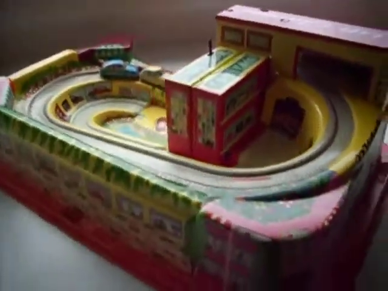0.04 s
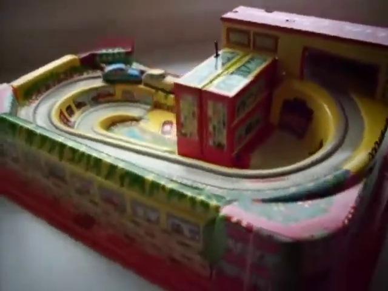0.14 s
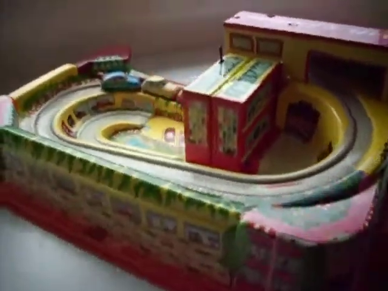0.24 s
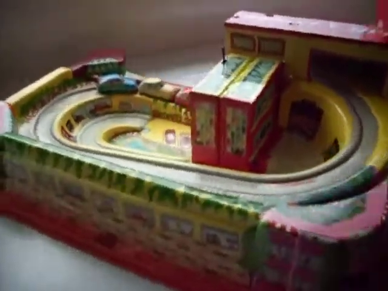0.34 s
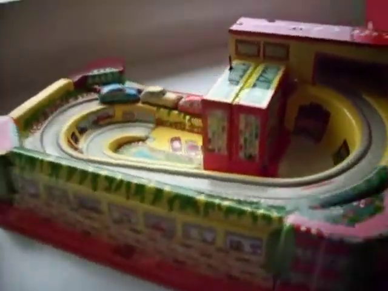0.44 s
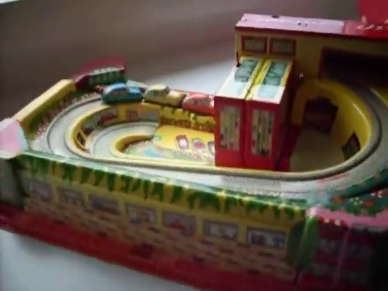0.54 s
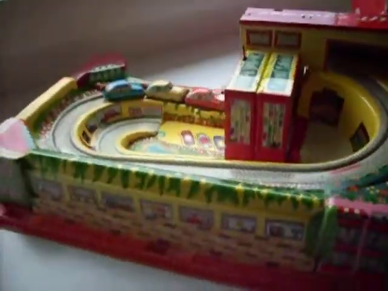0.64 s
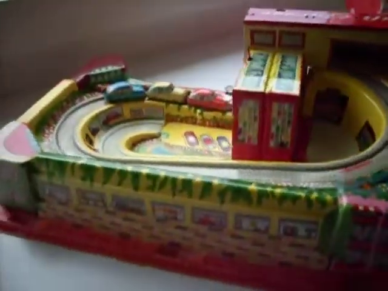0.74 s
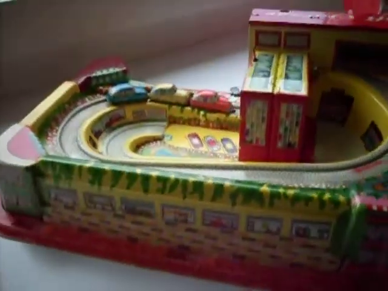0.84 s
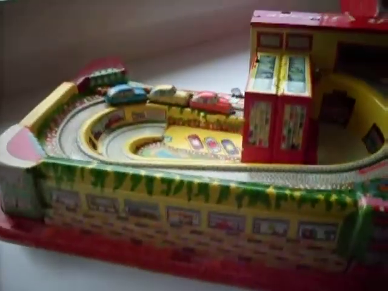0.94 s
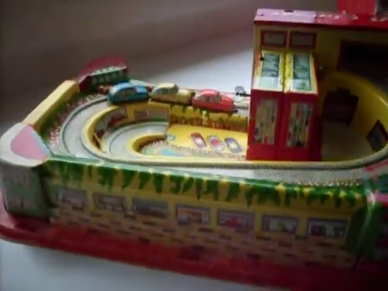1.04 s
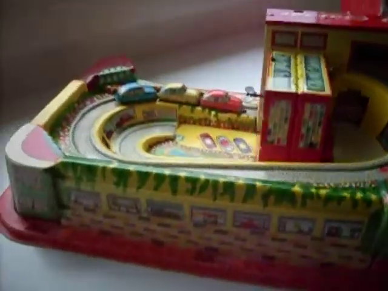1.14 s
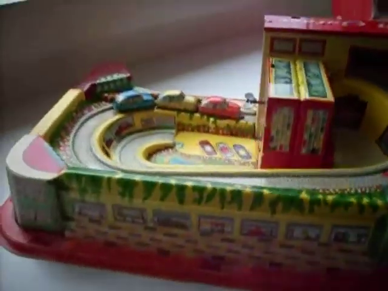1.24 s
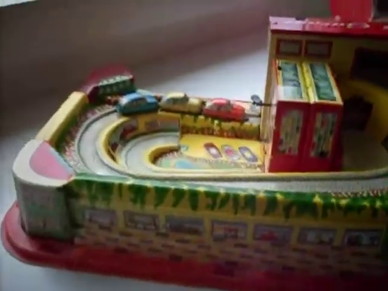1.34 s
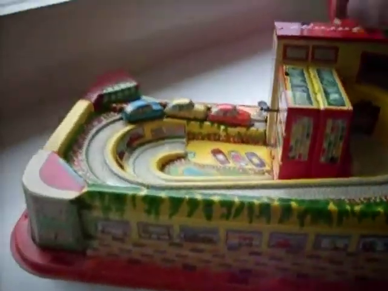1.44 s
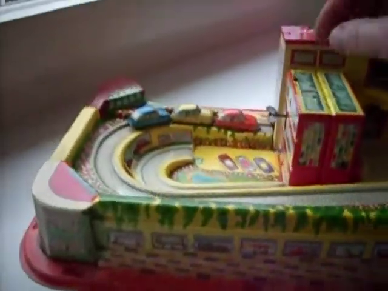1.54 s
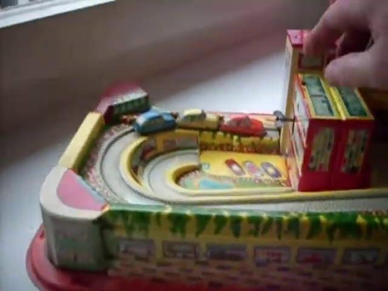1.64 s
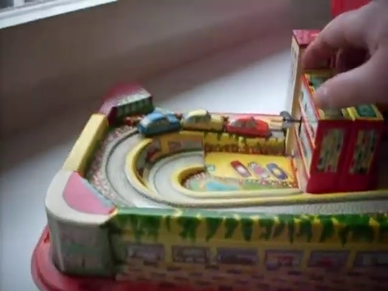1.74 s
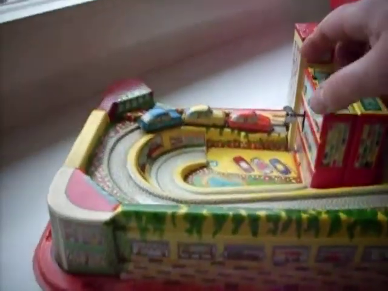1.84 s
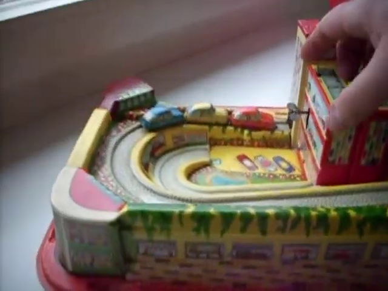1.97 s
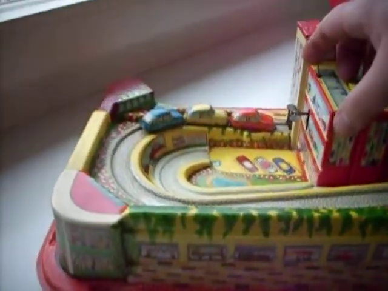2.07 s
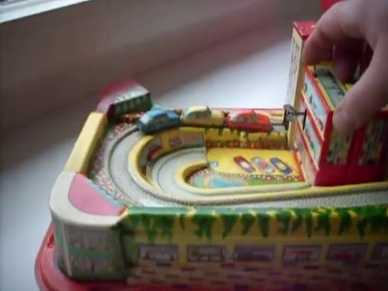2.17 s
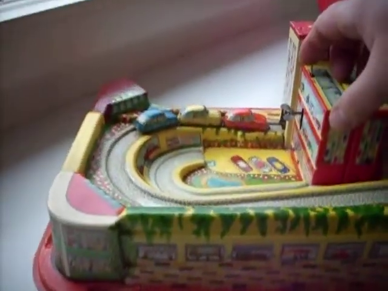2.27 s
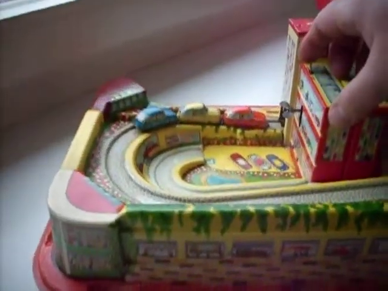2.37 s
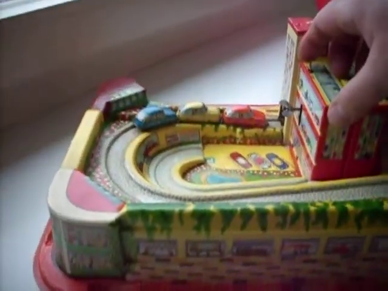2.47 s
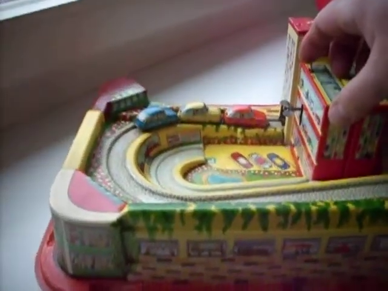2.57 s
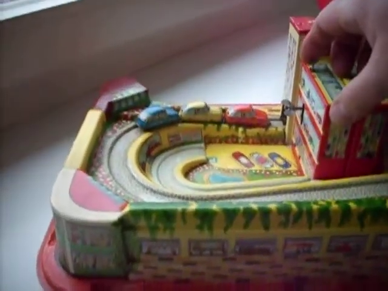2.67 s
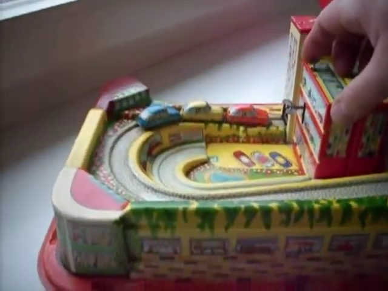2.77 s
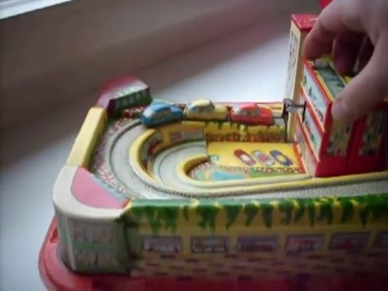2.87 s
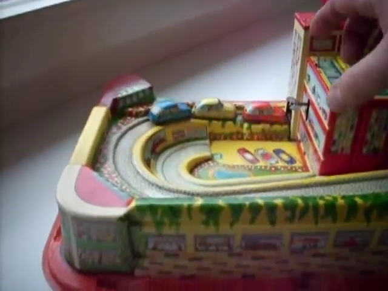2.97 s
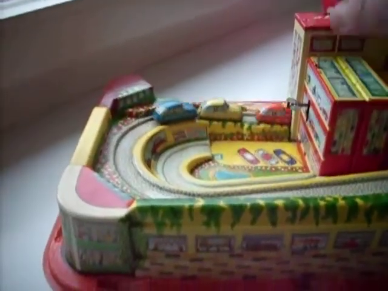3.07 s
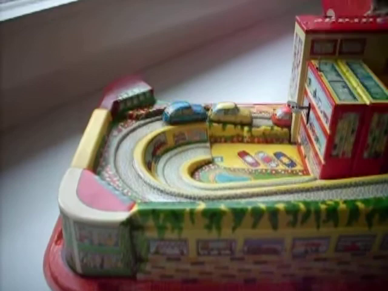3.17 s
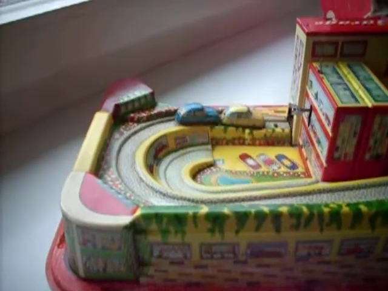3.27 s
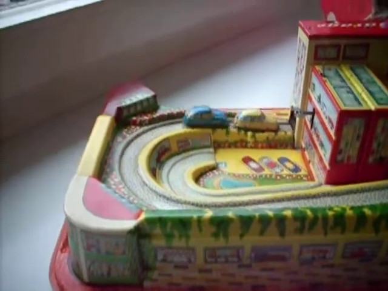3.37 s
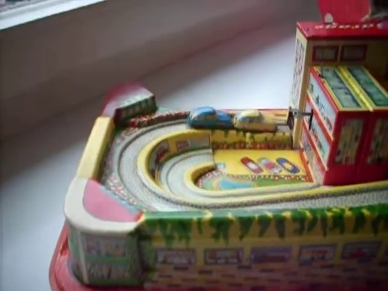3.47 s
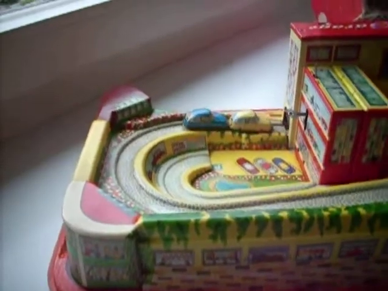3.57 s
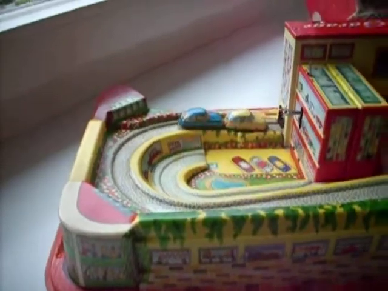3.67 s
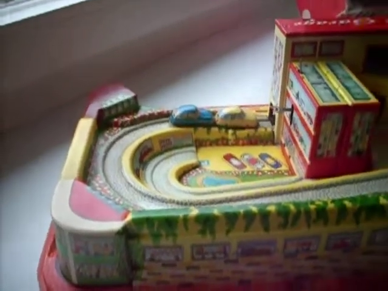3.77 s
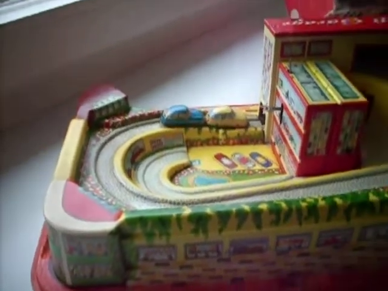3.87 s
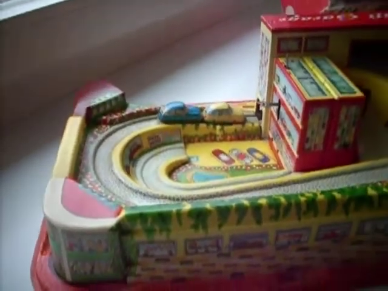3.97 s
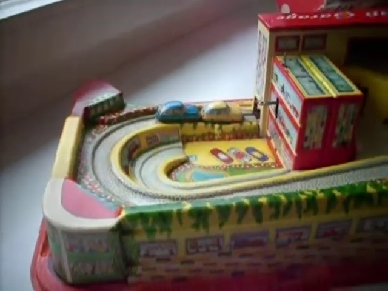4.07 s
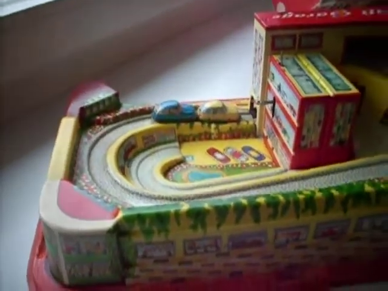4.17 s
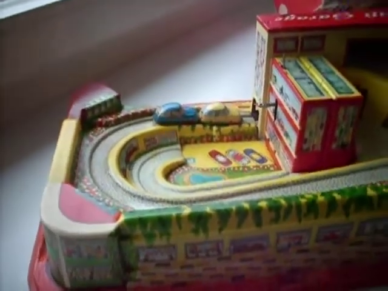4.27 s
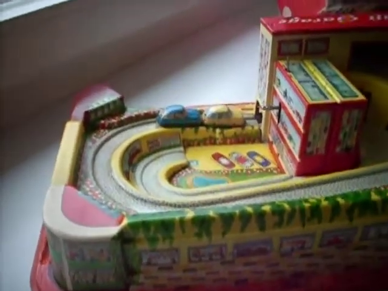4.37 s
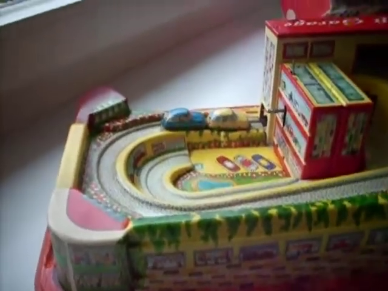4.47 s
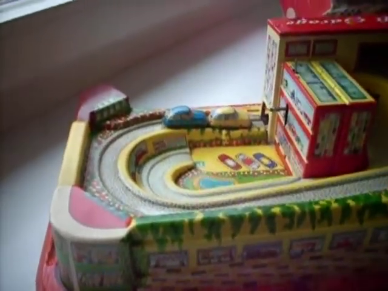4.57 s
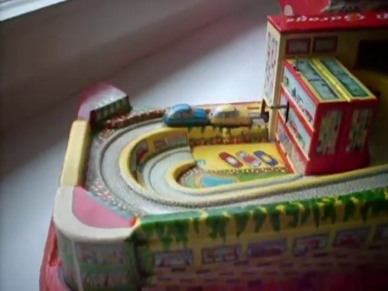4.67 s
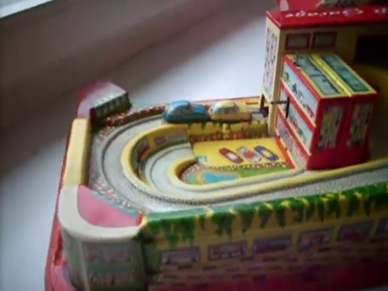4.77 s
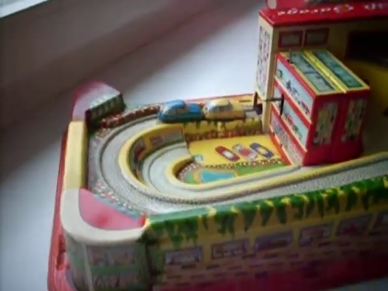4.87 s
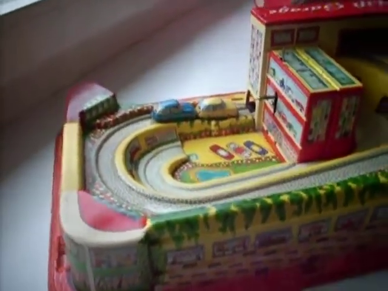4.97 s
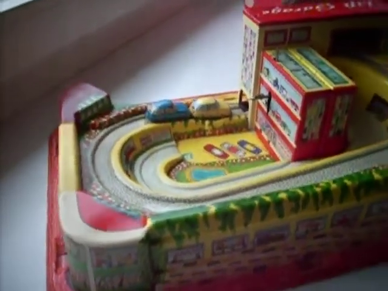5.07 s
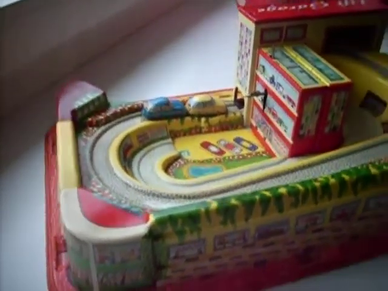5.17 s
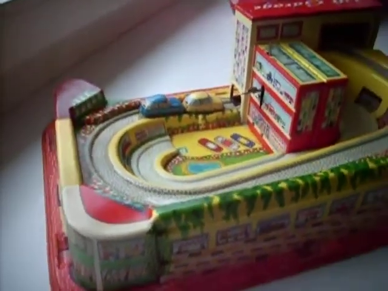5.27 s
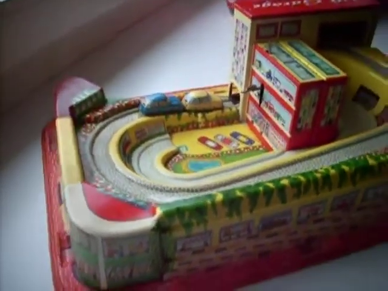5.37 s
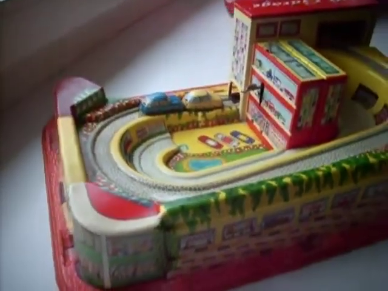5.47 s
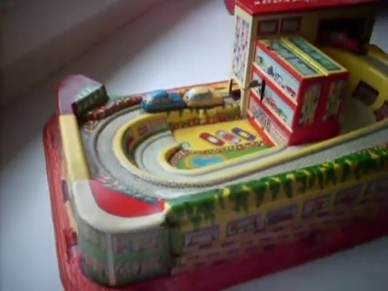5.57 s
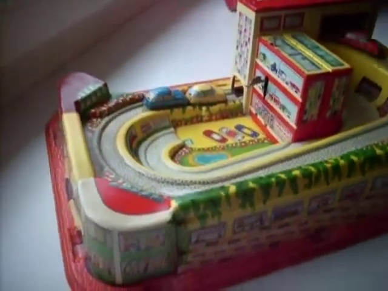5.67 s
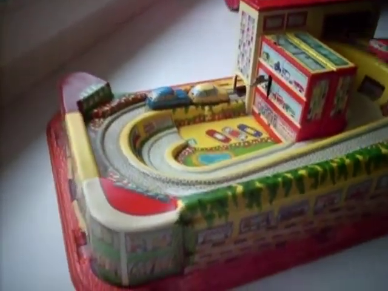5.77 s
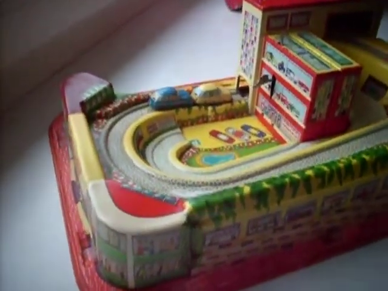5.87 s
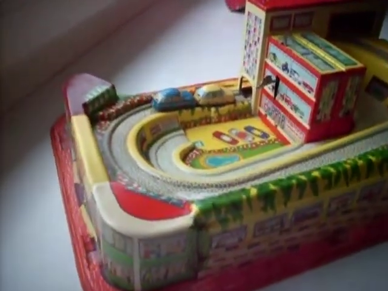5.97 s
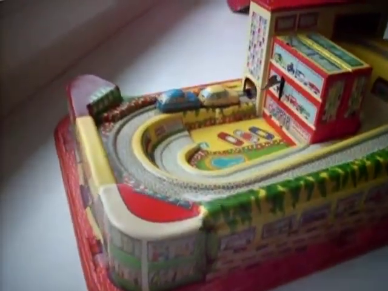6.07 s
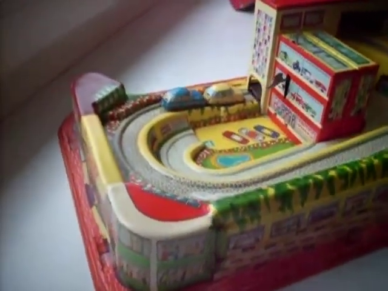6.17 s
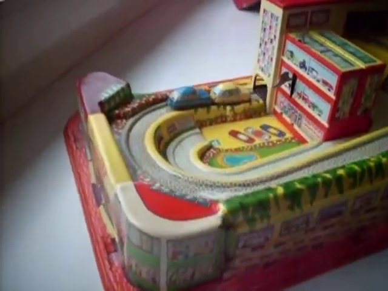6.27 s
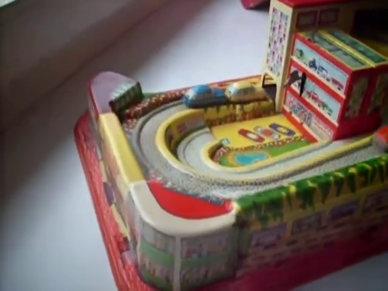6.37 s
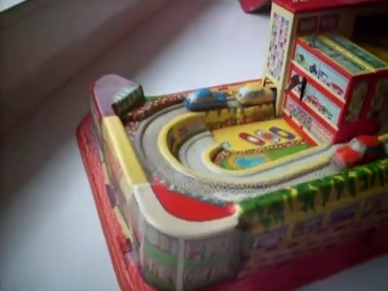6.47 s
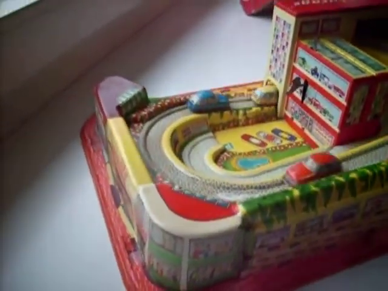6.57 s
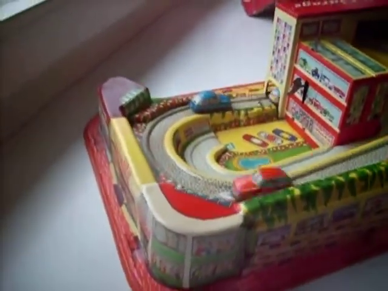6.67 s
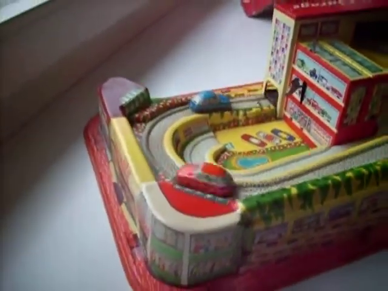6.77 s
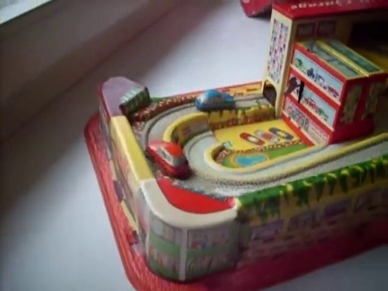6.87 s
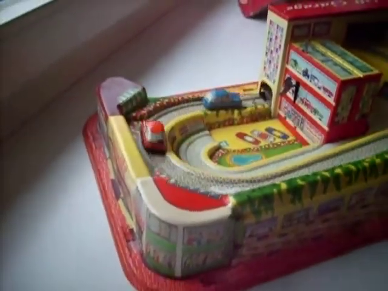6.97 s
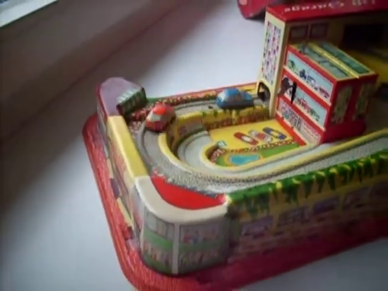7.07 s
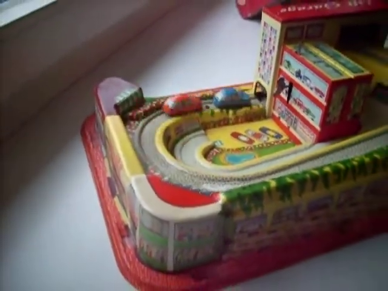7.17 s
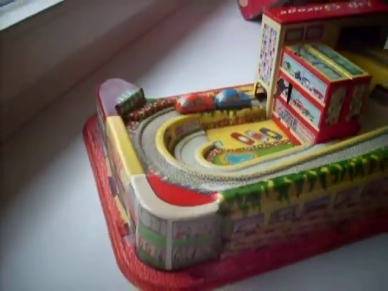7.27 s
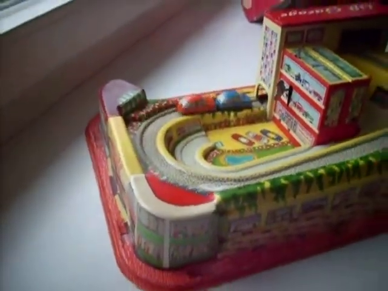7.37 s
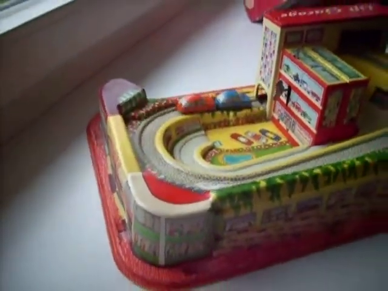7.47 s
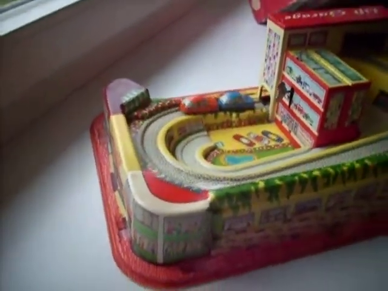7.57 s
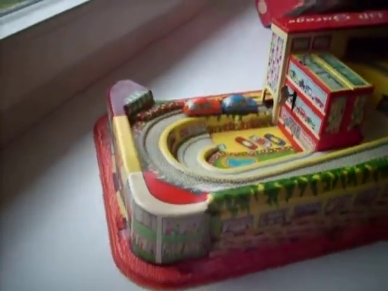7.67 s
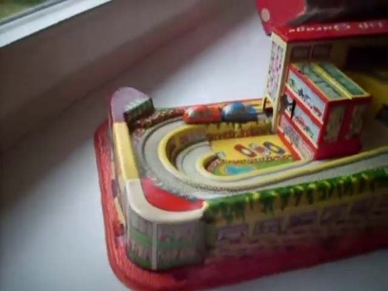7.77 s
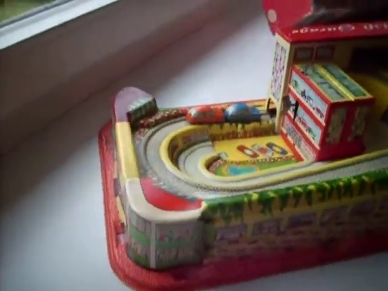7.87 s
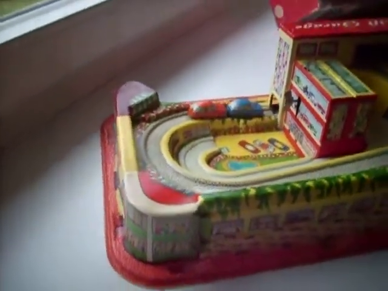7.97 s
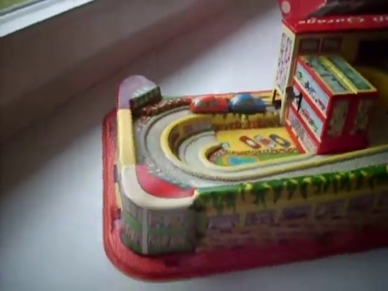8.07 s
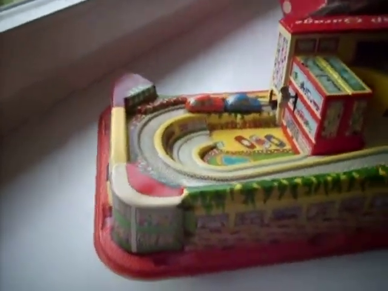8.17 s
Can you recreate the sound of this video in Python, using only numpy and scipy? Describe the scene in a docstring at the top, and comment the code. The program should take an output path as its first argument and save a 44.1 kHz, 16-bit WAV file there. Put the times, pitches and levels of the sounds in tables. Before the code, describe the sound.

In a quiet room, close to a small hand-held microphone, fingers lightly knock and rub a tin toy. A catch snaps sharply, then after a pause the motor starts almost at once, with a dense, bright gear whir and tinny rattle over a low hum. Small metal cars clink and roll; later one rumbles down the track and hits another with a hard clack. The motor keeps running, slightly fading.

```python
"""On a window sill a tin toy garage is handled, then its small motor is switched on.
The gear train whirs and rattles the printed tin panels, as showers of tiny impacts that follow the
shaft speed, faster or slower with the load; the rotor hums underneath as two gliding sines.
Little metal cars clink and roll on the lift and track: short blows ring a modal shell and the tin.
Knocks, a snapping catch and rubbing fingers are filtered noise bursts over a faint room hiss."""
import sys
import numpy as np
from scipy import signal
from scipy.fft import rfft, irfft
from scipy.io import wavfile

SR = 44100
rng = np.random.default_rng(int(sys.argv[2]) if len(sys.argv) > 2 else 0)


def file_out(sig):
    """Save sig as 16-bit WAV at sys.argv[1]."""
    # one column per channel
    cols = np.atleast_2d(sig).T
    # limit, then scale
    lim = np.clip(cols, -1, 1)
    pcm = np.round(lim * 32767).astype(np.int16)
    wavfile.write(sys.argv[1], SR, pcm)


N = 362943
TIME = np.arange(N) / SR
CRUISE_HZ = 140  # shaft speed at which the motor levels are set


def undb(db):
    """Decibels to gain."""
    return 10 ** (np.asarray(db) / 20)


def unit(x):
    """Scale to rms 1."""
    return x / np.sqrt(np.mean(x ** 2))


def peak(x, db):
    """Scale to a peak level."""
    return x * undb(db) / abs(x).max()


def add(out, s, sound):
    """Mix a sound in at time s."""
    i = int(s * SR)
    out[i:i + len(sound)] += sound[:N - i]


def curves(table):
    """Each column of a table joined by straight lines in time."""
    s, *columns = np.transpose(table)
    return [np.interp(TIME, s, column) for column in columns]


def walk(rate):
    """Random wander with a spread near 1: straight lines between `rate` random points a second."""
    knots = rng.standard_normal(4096)
    return 1.1 * np.interp(TIME * rate, np.arange(len(knots)), knots)


def fade(t, t60):
    """Exponential decay, 60 dB down after t60."""
    return np.exp(-np.log(1000) * t / t60)


def cut(x, hz, kind, order=2):
    """Butterworth low-pass or high-pass."""
    return signal.sosfilt(signal.butter(order, min(hz, SR / 2 - 1), kind, fs=SR, output="sos"), x)


def band(x, hz, width):
    """A single resonance with gain 1 at its centre."""
    return signal.lfilter(*signal.iirpeak(hz, hz / width, fs=SR), x)


def ring(x, response):
    """Play a force through an impulse response."""
    return signal.oaconvolve(x, response)[:len(x)]


def body(points, resonances=(), size=8192):
    """Causal impulse response of a (Hz, dB) colour with resonances standing out of it."""
    f = np.arange(size // 2 + 1) * SR / size
    hz, db = np.transpose(points)
    colour_db = np.interp(np.log(f + 1), np.log(hz), db)
    # folding the cepstrum forward gives minimum phase, so the sound starts at once
    cepstrum = irfft(np.log(undb(colour_db)))
    cepstrum[1:size // 2] *= 2
    cepstrum[size // 2 + 1:] = 0
    response = np.exp(rfft(cepstrum))
    for centre, width, lift_db in resonances:
        resonance = 1j * f * width / (centre ** 2 - f ** 2 + 1j * f * width)
        response *= 1 + (undb(lift_db) - 1) * resonance
    return irfft(response)[:size // 2]


def blow(t60, scatter, size=16384):
    """Force of one contact: a sharp push, then loose parts chattering to rest."""
    force = scatter * rng.standard_normal(size) * fade(np.arange(size) / SR, t60)
    force[0] += 1
    return force


def impacts(turns, count, scatter_db, slack):
    """Count impacts a shaft turn, each early or late by the slack and of its own strength."""
    chance = rng.standard_normal((1200 * count, 3))
    at_turn = (np.arange(len(chance)) + slack * chance[:, 0]) / count
    at = np.interp(at_turn, turns, np.arange(N))
    force = np.sign(chance[:, 1]) * undb(scatter_db * np.clip(chance[:, 2], -2, 2))
    inside = (at > 0) * (at < N - 1)
    return np.bincount(at.astype(int), force * inside, N)


def room():
    """Quiet room and microphone hiss as coloured noise, with a few steady electrical tones."""
    # colour of the hiss: pitch_hz, relative_db
    hiss_colour = [(12, -26.5), (20, -8.5), (65, -7.5), (149, -8), (186, -6), (211, -13), (307, -9.5),
                   (590, -17), (739, -14.5), (1280, -25.5), (2590, -27), (2790, -27), (6880, -30),
                   (7420, -29), (8000, -49.5), (10400, -72), (17600, -120)]
    # broad humps in the hiss: pitch_hz, width_hz, lift_db
    hiss_humps = [(4170, 450, 4.5), (5600, 500, 1.5)]
    # faint electrical hum and whine: pitch_hz, level_db (rms)
    whine = [(30, -77.5), (60, -80), (7418, -85), (7585, -87)]
    hiss_db = -66.74
    out = unit(ring(rng.standard_normal(N), body(hiss_colour, hiss_humps))) * undb(hiss_db)
    for hz, db in whine:
        out += np.sqrt(2) * undb(db) * np.sin(2 * np.pi * hz * TIME)
    return out


def casing_knocks():
    """Dull knocks: a chattering blow on the damped casing, each with its own brightness."""
    # start_s, level_db (peak), brightness_hz (low-pass), chatter_t60_s
    knocks = [(0.225, -48.5, 700, 0.27), (.307, -48, 750, 0.13), (0.349, -55, 260, 0.16),
              (0.788, -50, 380, 0.15), (0.907, -54, 900, 0.07), (1.185, -23, 1040, 0.0084),
              (1.193, -49, 900, 0.072), (1.28, -47.5, 298, 0.11), (1.326, -52.5, 260, 0.13),
              (1.777, -40.5, 1710, 0.13), (4.675, -42, 300, 0.28), (4.719, -52, 110, .35)]
    # colour of the damped casing: pitch_hz, relative_db
    casing_colour = [(40, -20.5), (150, -4), (300, -7.5), (500, -3.5), (950, 2), (1400, -15.5),
                     (2500, -8.5), (4000, -19), (8000, -20)]
    out, casing = np.zeros(N), body(casing_colour)
    for s, db, bright_hz, t60 in knocks:
        thud = cut(ring(blow(t60, scatter=0.14), casing), bright_hz, "low", order=3)
        add(out, s, peak(cut(thud, bright_hz / 5, "high"), db))
    return out


def catch_snaps():
    """A small metal catch ticks and snaps over: rattling blows through its resonances."""
    # start_s, level_db (peak), rattle_t60_s
    snaps = [(.549, -51.5, 0.039), (.957, -47.5, 0.012), (1.176, -26, 0.025), (1.1787, -24.5, 0.011),
             (1.1823, -24.5, 0.02), (1.193, -38, .008), (1.773, -49, 0.046)]
    # overall colour of the catch: pitch_hz, relative_db
    catch_colour = [(100, -11), (500, -5), (1000, 6.5), (1300, 2), (2300, -1), (3500, -2.5), (6000, -5.5),
                    (8200, -26)]
    # resonances of the catch: pitch_hz, width_hz, lift_db
    catch_modes = [(1810, 130, 5.5), (2380, 160, 16), (3000, 110, 8), (3780, 160, 6), (7040, 370, 11.5)]
    out, catch = np.zeros(N), body(catch_colour, catch_modes)
    for s, db, t60 in snaps:
        add(out, s, peak(ring(blow(t60, scatter=0.18), catch), db))
    return out


def finger_rubs():
    """Fingers rub the tin and make one panel or another sing: narrow noise that swells and fades."""
    # start_s, length_s, level_db (rms at full stroke), pitch_hz, width_hz (half of each filter's)
    rubs = [(0.241, 0.48, -70.5, 650, 402), (0.321, 0.22, -78, 2020, 220), (0.786, 0.094, -69, 1320, 140),
            (0.789, 0.25, -72, 755, 350), (0.813, 0.07, -73, 4800, 1500), (0.928, 0.042, -68, 2380, 150),
            (0.933, 0.034, -67, 1720, 100), (1.607, .18, -66, 720, 40), (1.774, 0.7, -74, 743, 40),
            (1.799, 0.089, -62.5, 483, 110)]
    out = np.zeros(N)
    for s, length, db, hz, width in rubs:
        noise = rng.standard_normal(SR)
        slips = unit(band(band(noise, hz, width * 2), hz, width * 2))
        stroke = signal.windows.tukey(int(length * SR), .5)
        add(out, s, undb(db) * stroke * slips[:len(stroke)])
    return out


def tin_body():
    """Impulse response of the printed tin: a broad colour with the panels ringing out of it."""
    # overall colour of the tin: pitch_hz, relative_db
    tin_colour = [(60, -32.5), (220, -14.5), (400, -15.5), (600, -2.5), (1050, -3), (1500, -10),
                  (2400, -4.5), (2950, -9.5), (3300, -8.5), (4000, -10), (5000, -7.5), (6500, -8),
                  (7400, -10), (7900, -20), (8300, -32.5)]
    # panel resonances: pitch_hz, width_hz, lift_db
    panels = [(314.3, 11.6, 16), (431.4, 84, 7), (522.6, 24, 7.5), (594, 77, 2.5), (759.4, 7.5, 6.5),
              (784.5, 82, 8), (919.5, 25.6, 7.5), (984, 21, 4), (1051, 72, 9.5), (1302, 14, 7.5),
              (1780, 4.2, 7), (2014, 3.4, 9.5), (2053, 29, 3), (2522, 110, 6.5), (2790, 46, 7),
              (2990, 26, 10), (4475, 98, 5.5), (5020, 240, 3), (5470, 53, 4.5), (5695, 250, 3),
              (7070, 69, 5), (6760, 31, 0.5)]
    return body(tin_colour, panels)


def car_shell(size=8192):
    """The ring of a car's shell: decaying modes that swell over their first cycles."""
    # modes of the shell: pitch_hz, relative_db, t60_s
    modes = [(2492, -8.5, 0.053), (2804, 15.5, 0.017), (2964, 7, 0.028), (3100, -25, 0.07),
             (3320, -22, 0.071), (4800, -27.5, 0.034), (7010, -35, 0.11), (7760, -27.5, 0.16)]
    t = np.arange(size) / SR
    rings = sum(undb(db) * np.sin(2 * np.pi * hz * t) * fade(t, t60) for hz, db, t60 in modes)
    return rings * (1 - fade(t, 0.012))


def rolling(tin, shell):
    """Small wheels jolt over the track, ever louder until the car stops; tin rumbles, shell buzzes."""
    # a car rolls into the lift, later down the track:
    # start_s, time_until_stop_s, rumble_level_db, buzz_level_db (rms at full loudness)
    rolls = [(2.96, 0.63, -43.5, -51.5), (6.518, 0.73, -38, -48)]
    wheel_hz, settle_t60_s = 90.4, .7  # wheel turns a second; trembling after the stop
    out = np.zeros(N)
    jolts = impacts(TIME * wheel_hz, count=12, scatter_db=3, slack=0.49)
    rumble = unit(band(ring(jolts, tin), hz=720, width=550))  # the track booms
    buzz = unit(ring(jolts, shell))
    for s, length, rumble_db, buzz_db in rolls:
        rise = np.sqrt(np.clip((TIME - s) / length, 0, 1))
        settle = fade(np.maximum(TIME - s - length, 0), settle_t60_s)
        out += rise * settle * (undb(rumble_db) * rumble + undb(buzz_db) * buzz)
    return out


def bumps(tin, shell, size=8192):
    """A graze, the hit and its bounces each ring the shell and shudder through the treble-dulling track."""
    # a car hits the lift, the rail or another car:
    # start_s, shell_level_db (peak), track_level_db (peak), bounces (rounded; none below 1)
    clinks = [(3.0102, -29, -31, 0), (3.294, -30, -44, 0.5), (3.309, -26.5, -24, 1),
              (3.3984, -26.5, -18.5, 1.5), (3.447, -28, -29, 1.5), (4.45, -41, -50, -1),
              (4.53, -50, -27.5, 0.5), (5.1636, -34, -33, 1), (6.6, -30.5, -39, 0), (6.795, -39, -21, 1),
              (7.13, -35, -24.5, 1), (7.2663, -7.5, -18, 2.5), (7.2947, -23.5, -32.5, 1)]
    graze_s, graze_db, bounce_s = 0.0015, -16, .0098  # lead of the graze, its level, time between hops
    # the shell rings less on any bounce than on the hit, and each hop is weaker than the last
    shell_bounce_db, shell_hop_db, track_hop_db = -20, -0.5, -3.5
    out = np.zeros(N)
    for s, shell_db, track_db, bounces in clinks:
        contacts = [(-graze_s, graze_db, graze_db), (0, 0, 0)]
        for k in range(1, round(bounces) + 1):
            contacts.append((k * bounce_s, shell_bounce_db + k * shell_hop_db, k * track_hop_db))
        for delay, ring_db, thud_db in contacts:
            shudder = ring(blow(t60=0.032, scatter=.55, size=size), tin)
            track = cut(shudder, 6700, "low", order=1)
            add(out, s + delay, peak(shell, shell_db + ring_db) + peak(track, track_db + thud_db))
    return out


def shaft_speed():
    """The motor's speed in Hz, nodding with a cam's load and never quite steady."""
    # mean shaft speed: time_s, speed_hz
    motor = [(2.62, 121.1), (2.76, 147.9), (3.04, 148.6), (3.19, 143.3), (3.38, 146.4), (3.55, 128.5),
             (5.0, 137.9), (5.4, 142.8), (5.53, 151.1), (5.79, 152.9), (6.15, 164.9), (6.33, 148.6),
             (6.8, 143.8), (6.88, 126.3), (7.16, 136.2), (8.06, 132.9), (8.2, 137.5)]
    # turns per cam cycle, share of the speed, a moment of least load
    cam_turns, cam_swing, cam_free_s = 53, .014, 4.08
    hz = curves(motor)[0]
    turns = np.cumsum(hz) / SR
    cam = np.cos(2 * np.pi * (turns - np.interp(cam_free_s, TIME, turns)) / cam_turns)
    return hz * (1 + cam_swing * cam + 0.0043 * walk(14))


def hum(turns, speed_hz):
    """The unbalanced rotor shakes the base once and twice a turn, booming where it meets a resonance."""
    # resonances of the base: pitch_hz, width_hz, lift_db
    base = [(164, 20, 16), (260, 14, 11), (304, 12, 19)]
    # sine peaks at cruising speed before the base lifts them, and their rise with speed
    hum_db, overtone_db, db_per_octave = -65.5, -70, 33

    def boom_db(hz):
        """Lift of the base at a pitch."""
        return sum(db / (1 + (2 * (hz - centre) / width) ** 2) for centre, width, db in base)

    angle = 2 * np.pi * turns + 0.16 * walk(30)
    shake_db = db_per_octave * np.log2(speed_hz / CRUISE_HZ)
    first = np.sin(angle) * undb(hum_db + shake_db + boom_db(speed_hz))
    second_db = overtone_db + shake_db + boom_db(2 * speed_hz) + 1.6 * walk(7.6)
    return first + np.sin(2 * angle) * undb(second_db)


def sheet(count, t60, share_db, size=8192):
    """Direct sound plus the many faint, longer rings of thin sheet metal."""
    t = np.arange(size) / SR
    pitch = rng.uniform(500, 7800, (count, 1))
    sign = rng.choice([-1, 1], (count, 1))
    rings = (sign * np.sin(2 * np.pi * pitch * t)).sum(0) * fade(t, t60)
    return (t == 0) + undb(share_db) * rings / np.linalg.norm(rings)


def gear_train(turns, speed_hz, tin):
    """Teeth tick and loose panels chatter, louder with speed and swelling as slower wheels come round."""
    octaves = np.log2(speed_hz / CRUISE_HZ)
    # rms level before any damping or microphone movement: at cruising speed, plus dB per octave of speed
    rattle_db = -40.5 + 15 * octaves
    clatter_db = -44.5 + 10.5 * octaves
    whir_db = -44.5 + 10 * octaves
    shaft = np.cos(2 * np.pi * turns)
    wheel = np.cos(2 * np.pi * (turns / 7 + .06 * walk(3)))
    drum = np.cos(2 * np.pi * (turns / 18 + 0.28 * walk(1.835)))
    bind = walk(70)
    teeth = impacts(turns, count=32, scatter_db=5, slack=.4)
    teeth = teeth * undb(1.53 * shaft + 1.0 * wheel + 0.3 * drum + 1.3 * bind)
    chatter = impacts(turns, count=12, scatter_db=2.5, slack=.45)
    chatter = chatter * undb(1.3 * wheel + .5 * drum + .7 * bind)
    # the light, hard teeth carry the middle and treble; the heavy panels carry the lows
    ticks = ring(ring(teeth, tin), sheet(count=220, t60=0.05, share_db=-17))
    whir = cut(ticks, 3670, "high", order=5)
    clatter = cut(cut(ticks, 1457, "high", order=3), 3070, "low", order=5)
    rattle = cut(ring(chatter, tin), 1077, "low", order=3)
    return unit(whir) * undb(whir_db) + unit(clatter) * undb(clatter_db) + unit(rattle) * undb(rattle_db)


def moving_microphone(x):
    """As the hand-held microphone moves, beaming panels come and go; at the end it draws back."""
    # three loud panels that beam their sound: pitch_hz, width_hz
    beams = [(455, 62), (1060, 220), (5510, 310)]
    # gain of those three bands: time_s, low_band_db, middle_band_db, high_band_db
    facing = [(2.7, 0, -2, 1.5), (3.4, 8.5, -5.5, 0.5), (3.9, 3.5, 0, 3.5), (4.5, 1.5, -1, 2),
              (5.2, -3, 2.5, 1), (6.1, 0, 3.5, -1.5), (6.6, 5.5, 2, 1), (7.2, -8, 1, -1), (8.0, 0, 3.5, 3)]
    # treble panels that drift in and out at random: pitch_hz, width_hz
    drifting = [(2510, 130), (7120, 790)]
    drift_db, back_off_s, back_off_db_per_s = 0.96, 7.4, -2.55
    for (hz, width), db in zip(beams, curves(facing)):
        x = x + (undb(db) - 1) * band(x, hz, width)
    for hz, width in drifting:
        x = x + (undb(drift_db * walk(2.34)) - 1) * band(x, hz, width)
    return x * undb(back_off_db_per_s * np.maximum(TIME - back_off_s, 0))


def scene():
    """The motor drives the gears and the hum; cars and fingers add their knocks."""
    switch_s, spin_up_s = 2.577, .1  # the switch closes and the gears take up their play
    hand_off_s, let_go_s, hand_db = 3.02, 0.047, -1.5  # the hand damps the tin until it lets go
    speed_hz = shaft_speed()
    turns = np.cumsum(speed_hz) / SR
    tin, shell = tin_body(), car_shell()
    switched_on = np.clip((TIME - switch_s) / spin_up_s, 0, 1)
    held = 1 - np.clip((TIME - hand_off_s) / let_go_s, 0, 1)
    drive = moving_microphone(gear_train(turns, speed_hz, tin)) + hum(turns, speed_hz)
    handling = casing_knocks() + catch_snaps() + finger_rubs()
    cars = rolling(tin, shell) + bumps(tin, shell)
    return (room() + handling + cars + switched_on * undb(hand_db * held) * drive)[None]


def record(dry):
    """A small microphone with a narrow band: a steep low-pass at 8200 Hz."""
    return signal.sosfilt(signal.ellip(10, .2, 70, 8200, fs=SR, output="sos"), dry)


dry = scene()
out = record(dry)
file_out(out)
```